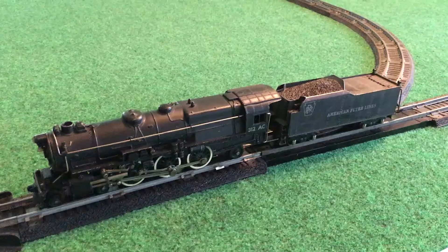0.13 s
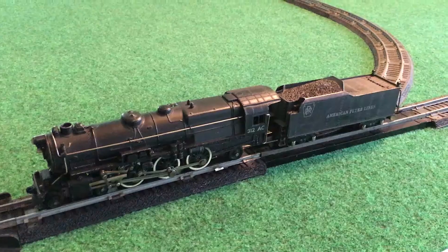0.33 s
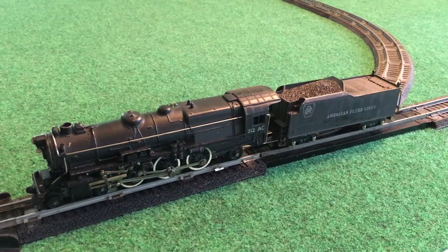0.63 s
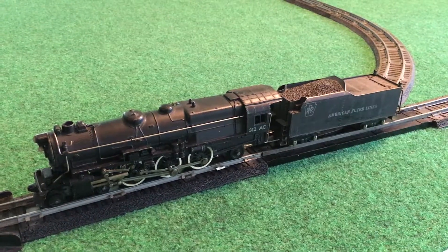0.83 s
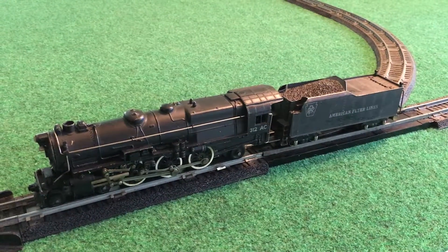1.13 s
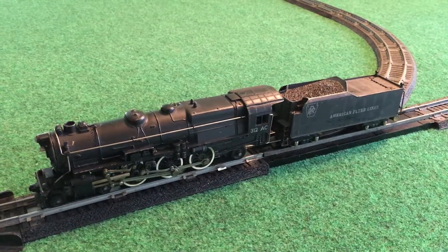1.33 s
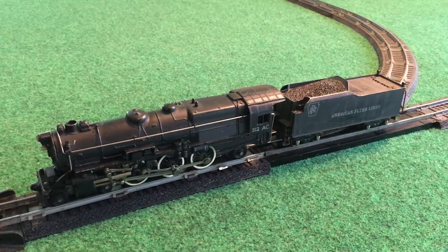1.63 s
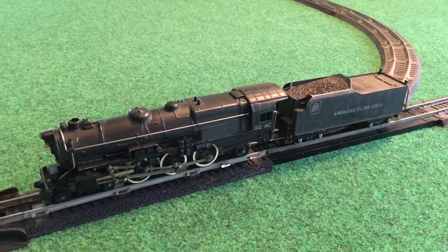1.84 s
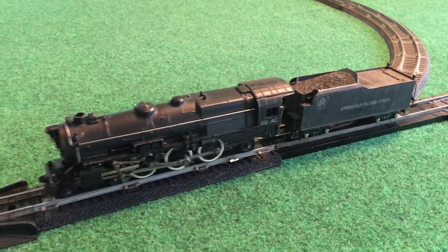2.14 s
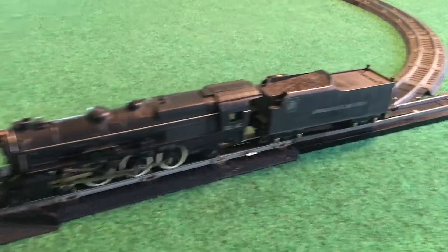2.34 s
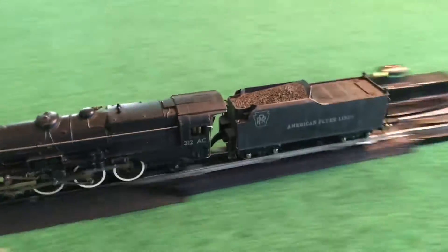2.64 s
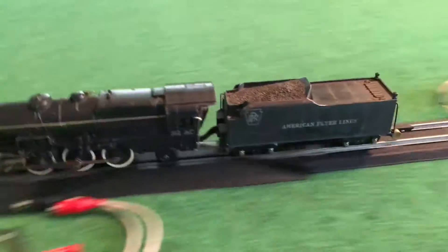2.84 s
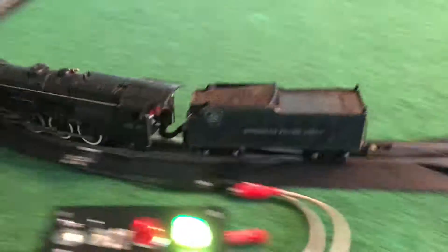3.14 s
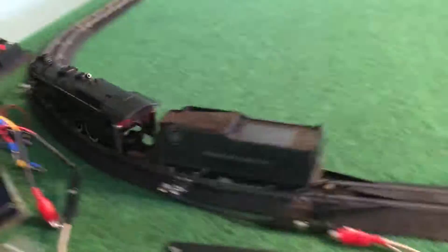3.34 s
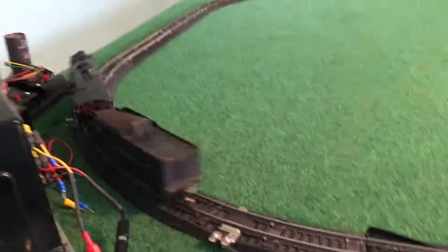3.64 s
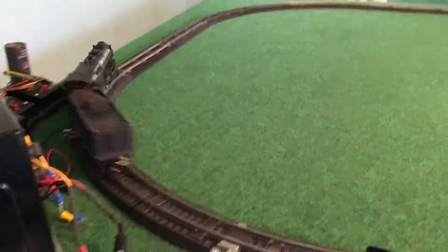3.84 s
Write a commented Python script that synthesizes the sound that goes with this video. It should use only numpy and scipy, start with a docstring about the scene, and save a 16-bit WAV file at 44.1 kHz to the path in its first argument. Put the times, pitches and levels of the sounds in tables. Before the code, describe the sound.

A toy steam locomotive sits in a quiet, faintly humming room; after a soft low rumble a relay clacks sharply, then it runs off rattling, pinging and chuffing quickly, picked up close by a phone.

```python
"""In a quiet room with a humming transformer, a toy steam locomotive stands on carpet. A soft low rumble of
filtered noise comes first, then the reversing relay clacks and rings the frame, and the engine runs off.
The motor growls in wavering tones; random clicks of gears and wheels rattle the body; a loose metal part
pings. A piston chuffs about seven times a second: puffs of gritty noise with a tone in each.
Levels rise and fall as it passes close by and turns away."""
import sys
import numpy as np
from scipy import signal
from scipy.fft import rfft, irfft
from scipy.io import wavfile
from scipy.ndimage import uniform_filter1d

SR = 44100
rng = np.random.default_rng(int(sys.argv[2]) if len(sys.argv) > 2 else 0)


def dump_mix(stems):
    """Bounce the given channels to the path in sys.argv[1] as a 16-bit WAV at rate SR."""
    frames = np.atleast_2d(stems).T  # one column per channel
    limited = np.clip(frames, -1, 1)  # hard clip at full scale
    pcm = np.round(limited * 32767).astype(np.int16)
    wavfile.write(sys.argv[1], SR, pcm)


N = 176400  # samples: 4 s

START_S, START_FADE_S = 0.211, 0.0031  # silence until here, then a quick fade-in
RUN_S, RUN_ATTACK_S = 2.272, 0.026  # the motor starts; time to reach full power
ROOM_DB, HUM_DB = -69.5, -1.5
RELAY_DECAY_S, RELAY_RING_DB = 0.0062, -6
THROB_HZ = 120
CRACKLE_DB = -3
BODY_DB, CHUFF_BODY_DB = -1, -6  # how strongly the gears and the chuffs ring the body
BODY_WIDTH_HZ = 20
MOTOR_FULL_S, MOTOR_GROWTH_DB_PER_S = 3.35, 10
SING_S, SING_WIDTH_S, SING_HZ, SING_DB = 2.55, 0.15, 5400, -45
JINGLE_S, JINGLE_WIDTH_S, JINGLE_DB = 2.88, 0.3, -38.5
PING_SCATTER_DB = 4  # chance difference in each mode's level
CHUFF_RISE_S, CHUFF_FALL_S, CHUFF_SHAPE = 0.018, 0.02, 1.7
TONE_WIDTH_HZ = 130
RASP_HZ, RASP_DEPTH_DB = 160, 10  # average judder rate of the piston; fall in level within each judder
BEND_S, BEND_WIDTH_S, BEND_DB, BEND_HZ = 3.86, 0.14, -38, 283
THUMP_T60_S = 0.1
ROOM_T60_S, ECHO_DB = 0.2, -17
TOP_HZ = 15900


def undb(db):
    """Turn decibels into a gain."""
    return 10 ** (np.asarray(db) / 20)


def unit(x):
    """Scale to an average (RMS) level of 1."""
    return x / np.sqrt(np.mean(x ** 2))


def noise():
    """Plain white noise."""
    return rng.standard_normal(N)


def walk(rate):
    """Smooth random wandering around zero with a spread of about 1; rate is new values per second."""
    step = int(SR / rate)
    stairs = np.repeat(rng.standard_normal(N // step + 1), step)
    return unit(uniform_filter1d(stairs, step))[:N]


def curve(t, rows, axis=1):
    """Gain over time, following one dB column of a table."""
    rows = np.array(rows)
    return undb(np.interp(t, rows[:, 0], rows[:, axis]))


def swell(t, s, width):
    """A smooth rise and fall around one moment."""
    return np.exp(-.5 * ((t - s) / width) ** 2)


def colour(x, points):
    """Shape by a spectrum that falls steeply beyond its ends."""
    f = np.fft.rfftfreq(N, 1 / SR) + 1  # 1 Hz up, to avoid log(0)
    p = np.array(points)
    low_skirt = np.minimum(f / p[0, 0], 1) ** 7
    high_skirt = np.minimum(p[-1, 0] / f, 1) ** 4
    shape = undb(np.interp(np.log(f), np.log(p[:, 0]), p[:, 1]))
    return unit(irfft(rfft(x) * low_skirt * high_skirt * shape, N))


def band(x, hz, width):
    """One resonance: a filter that favours pitches near hz."""
    return signal.lfilter(*signal.iirpeak(min(hz, SR * .45), hz / width, fs=SR), x)


def double_band(x, hz, width):
    """The same resonance twice over, for steeper sides, at unit level."""
    return unit(band(band(x, hz, width), hz, width))


def ring(age, modes):
    """Decaying tones of a struck part; each falls 60 dB in its t60."""
    return sum(undb(db) * np.sin(2 * np.pi * hz * age) * np.exp(-np.log(1000) * age / t60)
               for hz, db, t60 in modes)


def clicks(rate, spread_db):
    """Random tiny impacts of uneven size, about rate of them per second."""
    hits = rng.random(N) < rate / SR
    sign = rng.choice([-1, 1], N)
    size = undb(spread_db * np.clip(noise(), -2, 2))
    return unit(hits * sign * size)


def shell(x):
    """The sharp resonances of the body; each swells and fades as the parts shift."""
    # centres of the body's resonances [f/Hz]
    body_hz = [1454, 2169, 2594, 2863, 3065, 3301, 3461, 3908, 4624]
    return sum(band(x, hz, BODY_WIDTH_HZ) * undb(3 * walk(12)) for hz in body_hz)


def background(t):
    """Steady tones make the transformer's hum; shaped noise makes room air and the soft low rumble."""
    # transformer tones, before the overall hum level [f/Hz, level/dB]
    hum_tones = [(120, -65), (720, -72.5), (1200, -86), (1319, -80.5), (1439, -84)]
    # spectrum shapes of room air and rumble [f/Hz, relative level/dB]
    room_spectrum = [(52, -11), (75, -12.5), (100, -7), (135, -3.5), (170, -24), (267, -14.5), (600, -20.5),
                     (1400, -24), (4000, -30.5), (15500, -37)]
    rumble_spectrum = [(46, 5), (62, 4), (110, -5), (175, -10), (330, -22)]
    # level of the rumble over time [t/s, level/dB]
    rumble_level = [(1.765, -58), (1.8, -40.5), (1.9, -41.5), (1.99, -39.5), (2.05, -48), (2.15, -51),
                    (2.24, -56)]
    hum = sum(undb(db) * np.sqrt(2) * np.sin(2 * np.pi * (hz * t + rng.random())) for hz, db in hum_tones)
    air = undb(ROOM_DB) * colour(noise(), room_spectrum)
    rumble = curve(t, rumble_level) * colour(noise(), rumble_spectrum)
    return air + undb(HUM_DB) * hum + rumble


def thumps(t):
    """Dull bumps, muffled by the carpet: low decaying tones with a soft onset."""
    # soft low bumps [t/s, level/dB, f/Hz]
    bumps = [(1.895, -27.5, 57.6), (1.967, -32, 48), (2.301, -36, 181), (2.325, -41, 70), (2.498, -37, 62),
             (2.671, -36, 95), (3.684, -31.5, 158), (3.786, -27, 201), (3.791, -31, 355)]
    out = np.zeros(N)
    for s, db, hz in bumps:
        age = np.maximum(t - s, 0)
        out += ring(age, [(hz, db, THUMP_T60_S)]) * 2 * (1 - np.exp(-age / 0.01))
    return out


def relay(t):
    """The reversing relay scrapes in and slams home in bursts of noise, ringing the frame."""
    # relay blows [t/s, level/dB, chatter held before the decay/s]
    blows = [(2.247, -45, 0.0064), (2.2569, -25, 0.0082), (2.2721, -19, 0.0011)]
    # spectrum shape of the blows [f/Hz, relative level/dB]
    blow_spectrum = [(180, -45), (300, -41), (571, -34), (849, -2.5), (2040, -9), (2520, -3), (3810, -13.5),
                     (4210, -8.5), (4490, -12.5), (8840, -6), (15500, -10.5)]
    # ringing tones of relay and frame [f/Hz, relative level/dB, t60/s]
    frame_modes = [(790, -4, .09), (870, -2, 0.065), (2240, -2, .06), (4269, -2, 0.14), (5390, 10, 0.11),
                   (6174, 12, 0.072), (9049, 4, 0.058), (11300, 3, 0.07), (13850, 2, .1)]
    push = sum(undb(db) * (t >= s) * np.exp(-np.maximum(t - s - hold, 0) / RELAY_DECAY_S)
               for s, db, hold in blows)
    crack = push * colour(noise(), blow_spectrum)
    frame = signal.fftconvolve(crack, ring(t, frame_modes))[:N]
    return crack + undb(RELAY_RING_DB) * unit(frame) * np.std(crack)


def running_gear(t):
    """Gear teeth tick through the body in a mains throb; wheels rumble; pickups hiss and crackle on the rails."""
    # spectrum shapes of gears (and pickups) and of rolling wheels [f/Hz, relative level/dB]
    gear_spectrum = [(290, -52), (500, -11), (769, -1.5), (1100, 2.5), (1600, 5), (1850, 2), (2650, -1),
                     (2930, -4), (3960, -2.5), (4910, -11), (6000, -12), (6550, -8), (7560, -15),
                     (9510, -13.5), (10500, -18.5), (12100, -13), (15500, -17.5)]
    roll_spectrum = [(42, -16), (58, -10), (90, -2), (135, 4.5), (210, -3), (400, -1), (550, -6.5),
                     (700, 2.5)]
    # levels over time [t/s, wheel rumble level/dB, gear rattle level/dB, pickup hiss level/dB]
    running_levels = [(2.29, -44, -38.5, -44), (2.39, -46, -39.5, -43.5), (2.46, -43.5, -36.5, -41),
                      (2.51, -45, -28, -38.5), (2.6, -40, -33.5, -36), (2.8, -41, -29.5, -33.5),
                      (3.1, -42.5, -31, -32.5), (3.3, -42.5, -32.5, -32), (3.55, -39, -32.5, -33.5),
                      (3.72, -44.5, -35.5, -34.5), (3.82, -47, -34, -34), (3.97, -40, -34.5, -37)]
    throb = 1 + .15 * np.cos(2 * np.pi * THROB_HZ * t)

    teeth = colour(clicks(rate=1500, spread_db=1.5) * throb * undb(0.64 * walk(60)), gear_spectrum)
    teeth = signal.sosfilt(signal.butter(4, 4200, fs=SR, output="sos"), teeth)
    rattle = unit(teeth + undb(BODY_DB) * shell(teeth))

    # squared clicks are all positive: short bursts of strength for the crackle
    sparks = signal.fftconvolve(clicks(rate=220, spread_db=2) ** 2, np.exp(-t / .0007))[:N]
    crackle = np.sqrt(1 + undb(CRACKLE_DB) * np.abs(sparks) / sparks.mean())
    scrape = colour(noise() * crackle * throb, gear_spectrum)
    # six treble bands wander in level separately
    shifting = sum(walk(14) * band(scrape, hz, 1500) for hz in np.linspace(6000, 15000, 6))
    keep_treble = signal.butter(6, 4900, "high", fs=SR, output="sos")
    hiss = unit(signal.sosfilt(keep_treble, scrape + .2 * shifting))

    wheels = colour(noise() * undb(1.45 * walk(35)), roll_spectrum)
    layers = [wheels, rattle, hiss]
    return sum(curve(t, running_levels, axis=k) * layer for k, layer in enumerate(layers, start=1))


def motor(t):
    """Motor tones waver in pitch and level, and grow as the engine gets under way."""
    # motor tones: average pitch, and level before wavering and growth [f/Hz, level/dB]
    motor_tones = [(122, -51), (252, -48), (368, -45.5), (490, -56), (787, -53), (861, -52)]
    tones = np.zeros(N)
    for hz, db in motor_tones:
        level = undb(db + 4 * walk(22))
        pitch = hz * (1 + 0.013 * walk(25))
        tones += level * np.sin(2 * np.pi * np.cumsum(pitch) / SR)
    return tones * undb(MOTOR_GROWTH_DB_PER_S * np.minimum(t - MOTOR_FULL_S, 0))


def singing(t):
    """The frame sings thinly and unevenly as the wheels first get going: random taps ring one resonance."""
    taps = clicks(rate=400, spread_db=2)
    return undb(SING_DB) * double_band(taps, SING_HZ, 450) * swell(t, SING_S, SING_WIDTH_S)


def jingle(t):
    """Quick random taps keep the loose part chattering between its louder pings while the engine is near."""
    taps = clicks(rate=240, spread_db=3)
    chatter = unit(band(band(taps, 6560, 600), 6600, 600))
    return undb(JINGLE_DB) * chatter * swell(t, JINGLE_S, JINGLE_WIDTH_S)


def pings(t):
    """Taps on a small loose metal part: a tick and a short, buzzing high ring, its modes mixed anew each time."""
    # taps on the loose part [t/s, level/dB]
    taps = [(2.3286, -23), (2.341, -22.5), (2.351, -22), (2.3565, -23), (2.365, -22.5), (2.4965, -21),
            (2.505, -11.5), (2.5374, -18.5), (2.577, -19), (2.6073, -17.5), (2.631, -17), (2.635, -17),
            (2.7556, -24), (2.765, -25), (2.8002, -15.5), (2.8737, -14.5), (2.9393, -17), (3.0161, -20.5),
            (3.025, -16), (3.172, -30), (3.201, -28), (3.5868, -22)]
    # its ringing tones, before chance changes [f/Hz, relative level/dB, t60/s]
    ping_modes = [(6536, 0.5, 0.037), (6630, -1.5, 0.035), (5680, -15, 0.065)]
    out, age = np.zeros(N), t[:SR // 20]
    onset = 1 - np.exp(-age / 0.0001)
    for s, db in taps:
        modes = [(hz * (1 + 0.0049 * rng.standard_normal()),
                  level + PING_SCATTER_DB * rng.standard_normal(), t60) for hz, level, t60 in ping_modes]
        tone = ring(age, modes)
        tone /= np.abs(tone).max()
        tick = rng.standard_normal(len(age)) * np.exp(-age / 0.0021)
        buzz = undb(-2.5) * band(tick, 6300, 1250)
        i = int(s * SR)
        out[i:i + len(age)] += undb(db) * (tone + buzz + undb(-15) * tick) * onset
    return out


def ticks(t):
    """Hard ticks and scrapes of the running engine, some of them grit in the chuffs: short decaying bursts
    of noise, each with its own resonance."""
    # ticks, scrapes and grit [t/s, level/dB, resonance f/Hz]
    bursts = [(2.387, -31, 12000), (2.411, -27, 1390), (2.663, -20.5, 2180), (2.706, -19.5, 1540),
              (3.008, -17.5, 1590), (3.026, -17.5, 1650), (3.1527, -13.5, 1660), (3.749, -20, 9700)]
    out = np.zeros(N)
    for s, db, hz in bursts:
        body = unit(band(band(noise(), hz, hz * 0.67), hz, hz * 0.68))
        out += undb(db) * (t >= s) * np.exp(-np.abs(t - s) / 0.0019) * body
    return out


def chuffs(t):
    """Piston strokes force rasping, gritty air through a small sounding chamber and ring the body."""
    # strokes [peak t/s, chamber tone f/Hz, tone level/dB,
    #          low level/dB, middle level/dB, upper level/dB, hiss level/dB]
    strokes = [(2.705, 1553, -23, -25, -50, -32.5, -38), (2.868, 1455, -22, -26.5, -40, -31.5, -39),
               (3.019, 1497, -26.5, -22.5, -40, -30, -43), (3.159, 1562, -22.5, -21.5, -39, -27, -44),
               (3.305, 1500, -27, -24.5, -27, -30, -39), (3.45, 1510, -29, -28.5, -23, -47, -35),
               (3.596, 1404, -30, -25.5, -26.5, -36, -33), (3.743, 1261, -31.5, -36, -26, -40, -33.5),
               (3.89, 1267, -28, -35, -25, -39.5, -51)]
    # filters for the low, middle, upper and hiss parts of the air [f/Hz, width of each pass/Hz]
    air_bands = [(1780, 890), (2950, 1350), (4950, 1330), (10500, 9100)]
    cycle = np.cumsum(RASP_HZ * (1 + .3 * walk(RASP_HZ))) / SR % 1
    flutter = undb(-RASP_DEPTH_DB * cycle)
    grit = (clicks(rate=1800, spread_db=2) + .5 * noise()) * flutter
    air = [double_band(grit, hz, width) for hz, width in air_bands]
    out = np.zeros(N)
    for s, hz, tone_db, *band_db in strokes:
        side_s = np.where(t < s, CHUFF_RISE_S, CHUFF_FALL_S)
        stroke = np.exp(-np.abs((t - s) / side_s) ** CHUFF_SHAPE)
        pitch = hz + .5 * TONE_WIDTH_HZ * walk(300)
        tone = flutter * np.sin(2 * np.pi * np.cumsum(pitch) / SR)
        tone = unit(band(tone, hz, hz / 2))
        # neighbouring bands have opposite sign
        puff = sum((-1) ** k * undb(db) * air[k] for k, db in enumerate(band_db))
        out += stroke * (undb(tone_db) * tone + puff)
    cut_bass = signal.butter(4, 1000, "high", fs=SR, output="sos")
    return signal.sosfilt(cut_bass, out + undb(CHUFF_BODY_DB) * shell(out))


def bend(t):
    """Lumpy low drumming of the track as the wheels take the curve: random clicks ring a low resonance."""
    drum = double_band(clicks(rate=300, spread_db=4), BEND_HZ, 270)
    return undb(BEND_DB) * drum * swell(t, BEND_S, BEND_WIDTH_S)


def scene():
    """Mix the train, its short room echo and the background, with a quick fade-in."""
    t = np.arange(N) / SR
    power = np.clip((t - RUN_S) / RUN_ATTACK_S, 0, 1)
    running = power * (running_gear(t) + motor(t) + singing(t) + jingle(t))
    train = thumps(t) + relay(t) + running + pings(t) + ticks(t) + chuffs(t) + bend(t)
    # the echo is a decaying wash of noise that starts after 4 ms
    tail = band(noise(), 1100, 5200) * np.exp(-np.log(1000) * t / ROOM_T60_S) * (t > .004)
    echo = signal.fftconvolve(train, tail / np.linalg.norm(tail))[:N]
    fade_in = np.clip((t - START_S) / START_FADE_S, 0, 1)
    return ((train + undb(ECHO_DB) * echo + background(t)) * fade_in)[None]


def record(dry):
    """The phone cuts the top: a steep low-pass filter."""
    return signal.sosfilt(signal.ellip(10, .2, 70, TOP_HZ, fs=SR, output="sos"), dry)


dry = scene()
out = record(dry)
dump_mix(out)
```